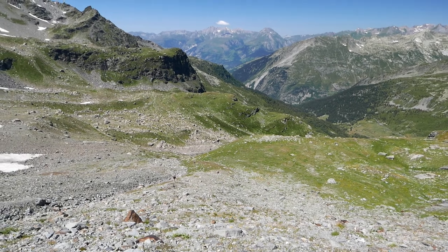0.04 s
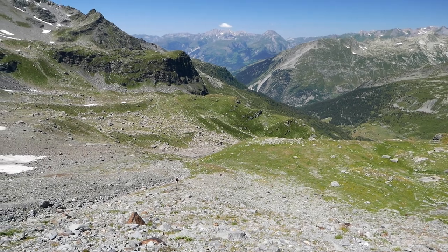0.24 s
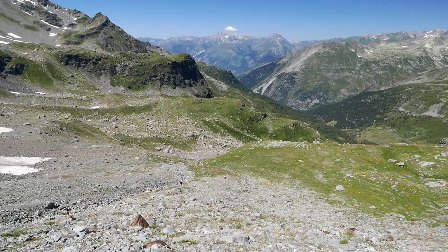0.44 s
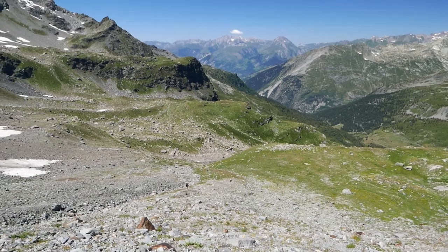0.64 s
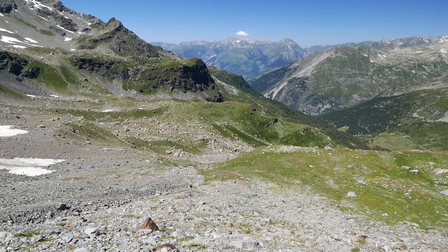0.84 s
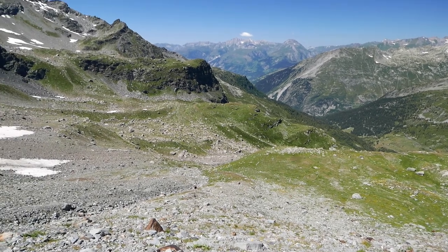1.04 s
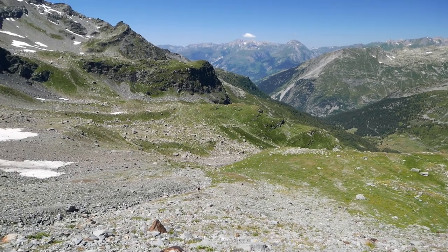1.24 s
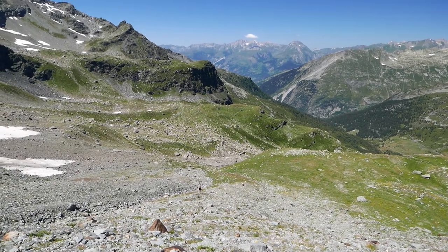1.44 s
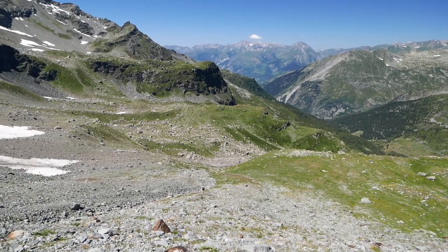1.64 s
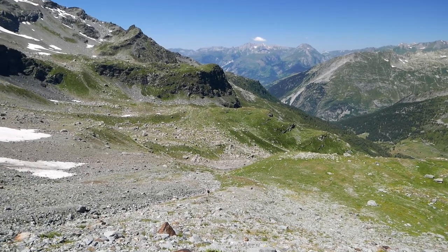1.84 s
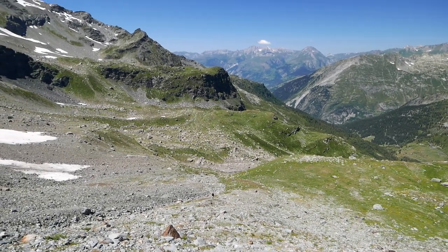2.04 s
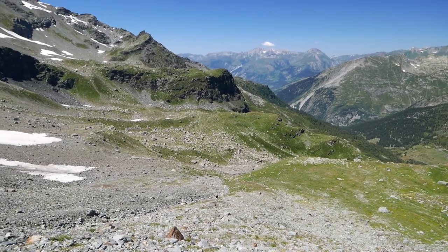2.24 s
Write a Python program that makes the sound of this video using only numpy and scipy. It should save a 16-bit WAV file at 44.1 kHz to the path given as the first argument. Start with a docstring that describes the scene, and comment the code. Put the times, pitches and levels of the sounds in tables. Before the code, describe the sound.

A gust of wind rumbles and flutters against the microphone, mostly on the left, over the faint hiss of an open mountainside. A weak hollow rush and slight airy whistle come through as it peaks and fades.

```python
"""Over the faint steady hiss of an open mountain slope, a gust buffets two microphone ports, the left first.
Its turbulent pressure makes a lumpy rumble and its eddies short low thumps; each port is heard faintly
and a little later in the other channel. The gust spreads to both ports, and the passing air stirs
a few hollow resonances and a faint whistle. It leans left again and dies away; the resonances
swell weakly once more, and the hiss remains."""
import sys
import numpy as np
from scipy import signal
from scipy.fft import rfft, irfft
from scipy.io import wavfile
from scipy.ndimage import uniform_filter1d

SR = 44100
rng = np.random.default_rng(int(sys.argv[2]) if len(sys.argv) > 2 else 0)


def transcribe(u):
    """Save the signal u as a 16-bit wav file named by the first command-line argument.

    u: samples, shape (n,) or (channels, n), limited to [-1, 1]; the rate is SR.
    q: integer samples, one column per channel.
    """
    v = np.clip(np.atleast_2d(u).T, -1, 1)
    q = np.round(v * 32767).astype(np.int16)
    wavfile.write(sys.argv[1], SR, q)


N = 105840
TIME = np.arange(N) / SR
FREQS = np.maximum(np.arange(N // 2 + 1) * SR / N, 1)


def from_db(db):
    """The decibel scale: 20 dB is a factor of ten in amplitude."""
    return 10 ** (np.asarray(db) / 20)


def rms_one(x):
    """Normalisation to unit mean power."""
    return x / np.sqrt(np.mean(x ** 2) + 1e-20)


def in_time(rows):
    """Linear interpolation of a table's columns at every sample."""
    times, *columns = np.transpose(rows)
    return np.array([np.interp(TIME, times, column) for column in columns])


def at_hz(points):
    """Interpolation of a table over log frequency."""
    hz, value = np.transpose(points)
    return np.interp(np.log(FREQS), np.log(hz), value)


def bell(offset):
    """Gaussian envelope; its half length, one standard deviation, is an offset of 1."""
    return np.exp(-.5 * np.minimum(offset ** 2, 100))


def resonance(hz, width_hz):
    """Steep band-pass response, width_hz wide between its half-power points."""
    return 1 / np.sqrt(1 + ((FREQS - hz) / (width_hz / 2)) ** 4)


def panned(pan_db):
    """Constant-power panning: two gains, with the left pan_db above the right."""
    sides = from_db([[pan_db / 2], [-pan_db / 2]])
    return sides / np.sqrt(np.sum(sides ** 2))


def delayed(x, lag_s):
    """Propagation delay, to a fraction of a sample."""
    return np.interp(TIME - lag_s, TIME, x)


def noise(gain):
    """Spectral shaping of white noise, rms 1."""
    return rms_one(irfft(rfft(rng.standard_normal(N)) * gain, N))


def stereo_noise(gain, correlation):
    """Partial coherence: the balance of mid and side noise sets the channels' correlation; rms 1."""
    mid, side = rfft(rng.standard_normal((2, N))) * gain
    mid, side = mid * np.sqrt(1 + correlation), side * np.sqrt(1 - correlation)
    return rms_one(irfft(np.array([mid + side, mid - side]), N))


# Spectrum of the hiss: (frequency [Hz], relative spectral density [dB])
HISS_SPECTRUM = [(25, 1), (45, 3), (70, 7), (110, -2), (200, 12.5), (330, 19.5), (420, 11.5), (475, 3),
                 (560, 18), (850, 15), (1400, 12.5), (2000, 9.5), (3000, 2), (3500, 7.5), (4100, -0.5),
                 (5000, -0.5), (6200, 2), (7000, 0.5), (7400, -5.5), (7800, -9), (8100, -2), (8400, -5.5),
                 (9000, 0), (10000, 1.5), (15500, -4)]
# Likeness of its two channels: (frequency [Hz], correlation [-1 to 1])
HISS_CORRELATION = [(100, 0.48), (420, 0.83), (600, -0.17), (1400, -0.8), (2500, -0.32), (3500, 0.11),
                    (5000, 0.27), (7000, 0.27), (10000, 0.49), (15000, 0.45)]
def hiss(level_db=-58):
    """Stationary broadband noise of the open slope and the microphone."""
    return from_db(level_db) * stereo_noise(from_db(at_hz(HISS_SPECTRUM)), at_hz(HISS_CORRELATION))


# Hollow resonances: (frequency [Hz], bandwidth [Hz], relative level [dB], left minus right [dB])
RESONANCES = [(952, 85, -7, 5.5), (1242, 193, -3.5, -10), (1620, 220, -5.5, -18), (2480, 3100, -7, 2),
              (3657, 100, -10, -3)]
# Swells of the passing air: (time [s], level [dB], half length [s], whistle relative to swell [dB])
AIR_SWELLS = [(0.726, -71.5, 0.014, 11), (.8, -76.5, 0.0087, 14), (0.889, -66, 0.014, 11.5),
              (0.982, -67, 0.032, 2.5), (1.102, -63, 0.012, -2), (1.216, -62.5, 0.021, 4.5),
              (1.469, -55, 0.016, -6.5), (1.528, -59, 0.0071, -4), (1.632, -57, 0.025, 1),
              (1.76, -60, 0.026, -4), (2.176, -61.5, 0.012, -11), (2.237, -62, 0.0084, 2.5)]
def hollow_rush(floor_db=-65, correlation=0.69, left_lag_s=0.00006):
    """Forced resonance: air noise excites a few bands that swell and fade together."""
    left, right = sum(from_db(db) * panned(pan_db) * stereo_noise(resonance(hz, width_hz), correlation)
                      for hz, width_hz, db, pan_db in RESONANCES)
    swells = sum(from_db(db) * bell((TIME - s) / half_s) for s, db, half_s, _ in AIR_SWELLS)
    return np.array([delayed(left, left_lag_s), right]) * (from_db(floor_db) + swells)


def whistle(left_lag_s=0.000097):
    """A sharp resonance narrows noise to an airy pitch, on the right, sounding with the same swells."""
    envelope = sum(from_db(db + whistle_db) * bell((TIME - s) / half_s)
                   for s, db, half_s, whistle_db in AIR_SWELLS)
    tone = envelope * noise(resonance(hz=1651, width_hz=36))
    return panned(pan_db=-4) * np.array([delayed(tone, left_lag_s), tone])


# Brighter puffs at the ports: (time [s], level [dB], left minus right [dB])
PORT_PUFFS = [(.519, -41.5, 6), (.976, -53, 13), (1.007, -42.5, 1)]
def puffs(half_s=0.0028):
    """Band-limited noise bursts: the fastest swirls sound above the rumble for a few milliseconds."""
    envelope = sum(from_db(db) * panned(pan_db) * bell((TIME - s) / half_s)
                   for s, db, pan_db in PORT_PUFFS)
    swirl = stereo_noise(resonance(hz=620, width_hz=260), correlation=-0.2)
    power = uniform_filter1d(swirl ** 2, size=500)
    return envelope * swirl / np.sqrt(power + 1e-9)


# Turbulent pressure at a port: (frequency [Hz], relative spectral density [dB])
TURBULENCE_SPECTRUM = [(20, -19), (45, -3), (65, -14.5), (95, -5), (135, 3), (230, 1.5), (320, -6),
                       (410, -16), (480, -24), (700, -42.5), (1500, -49), (4000, -67)]
def port_rumble(flow_db, gain_db=1.5, lump_db=6, lump_hz=47, crossover_hz=150):
    """Intermittent turbulence: pressure comes in lumps, louder and brighter as the flow grows."""
    pressure = noise(from_db(at_hz(TURBULENCE_SPECTRUM)))
    lumps = noise(1 / (1 + (FREQS / lump_hz) ** 2))
    pressure *= from_db(lump_db * lumps)
    power = uniform_filter1d(uniform_filter1d(pressure ** 2, size=1400), size=1400)
    pressure /= np.sqrt(power + 1e-9)   # evens out slow changes, keeps the quick lumps
    low = irfft(rfft(pressure) / (1 + (FREQS / crossover_hz) ** 4), N)
    high = pressure - low
    tilt_db = 0.51 * (flow_db + 37)   # high band against low: slow air is duller
    brightness = from_db(tilt_db / 2)
    return (low / brightness + high * brightness) * from_db(flow_db + gain_db)


PORT_LAG_S = 0.00022   # delay from one port to the other channel
# Strength of the turbulence at the ports: (time [s], left level [dB], right level [dB])
PORT_FLOW = [(0, -49.5, -70), (.1, -44, -46.5), (.2, -45.5, -54.5), (.245, -50.5, -75), (.28, -40, -64),
             (.37, -52.5, -57), (.43, -35, -48), (.465, -41, -59), (.52, -42, -48.5), (.6, -44, -42),
             (.68, -49, -34), (.77, -47, -35.5), (.82, -50, -45.5), (.9, -35.5, -34.5), (1.0, -33, -45.5),
             (1.15, -38.5, -44), (1.25, -37.5, -55), (1.32, -46, -43), (1.395, -37.5, -43.5),
             (1.425, -52.5, -68), (1.46, -32, -62), (1.51, -68, -72), (1.64, -72, -77), (1.72, -48, -55),
             (1.81, -62, -68), (1.85, -45, -59), (1.88, -73, -81), (2.18, -81, -78), (2.3, -59, -64),
             (2.4, -79, -62)]
def rumble(leak_db=-16):
    """Crosstalk: each port has its own turbulence, which reaches the other channel weaker and later."""
    left, right = [port_rumble(flow_db) for flow_db in in_time(PORT_FLOW)]
    leaked = np.array([delayed(right, PORT_LAG_S), delayed(left, PORT_LAG_S)])
    return np.array([left, right]) + from_db(leak_db) * leaked


# Eddies striking the ports: (time [s], relative level [dB], left minus right [dB], frequency [Hz])
EDDY_STRIKES = [(.024, -31, 14, 152), (.178, -23.5, 16, 205), (.2, -31.5, 20, 202), (0.21, -26.5, 12, 159),
                (.339, -16, 16.5, 274), (.417, -24, 13, 203), (.504, -22, 23, 229), (0.537, -27.5, 6, 238),
                (.584, -26, 11, 233), (.644, -19.5, 10, 226), (.706, -23, -15, 234),
                (0.766, -24.5, -13, 214), (0.87, -23, 9, 215), (0.955, -22.5, -7, 175),
                (0.975, -18, 13, 243), (1.022, -15.5, 14, 240), (1.058, -21.5, 8, 221),
                (1.077, -19.5, 16, 226), (1.111, -13, 15, 277), (1.144, -20, 15, 260), (1.18, -18, 14, 197),
                (1.223, -24, 14, 176), (1.292, -22, 5, 185), (1.32, -30.5, -3, 192),
                (1.353, -24.5, -14, 200), (1.383, -21, 17, 244), (1.466, -21.5, 12, 224),
                (1.558, -42, 28, 162), (1.699, -37, 23, 226), (1.765, -44, 12, 139),
                (1.832, -32.5, 34, 214)]
def eddies(gain_db=-0.5, half_cycles=0.5, wake_db=-14.5, wake_lag_s=0.0015, wake_half_s=0.0084):
    """Pressure transients: each eddy is a swing of about two cycles within a short turbulent wake."""
    thumps = np.zeros((2, N))
    churn = from_db(wake_db) * noise(from_db(at_hz(TURBULENCE_SPECTRUM)))
    for (s, db, pan_db, hz), phase in zip(EDDY_STRIKES, rng.random(len(EDDY_STRIKES))):
        cycles = (TIME - s) * hz
        swing = bell(cycles / half_cycles) * np.cos(2 * np.pi * (cycles + phase))
        wake = churn * bell((TIME - s - wake_lag_s) / wake_half_s)
        near = swing + wake
        far = delayed(near, PORT_LAG_S)
        channels = np.array([near, far] if pan_db > 0 else [far, near])
        thumps += from_db(db + gain_db) * panned(pan_db) * channels
    return thumps


def scene(bass_cut_hz=82.2, notch_db=-5.5):
    """Superposition of all sources; the microphone's response thins and notches rumble and eddies."""
    bass_cut = signal.butter(4, bass_cut_hz, "high", fs=SR, output="sos")
    notch = from_db(notch_db * resonance(hz=469, width_hz=34))
    buffeting = signal.sosfilt(bass_cut, rumble() + eddies())
    buffeting = irfft(rfft(buffeting) * notch, N)
    return buffeting + puffs() + hollow_rush() + whistle() + hiss()


def record(dry, cutoff_hz=15650):
    """Band limiting: an elliptic low-pass cuts the highest treble steeply."""
    return signal.sosfilt(signal.ellip(12, .1, 70, cutoff_hz, fs=SR, output="sos"), dry)


dry = scene()
out = record(dry)
transcribe(out)
```